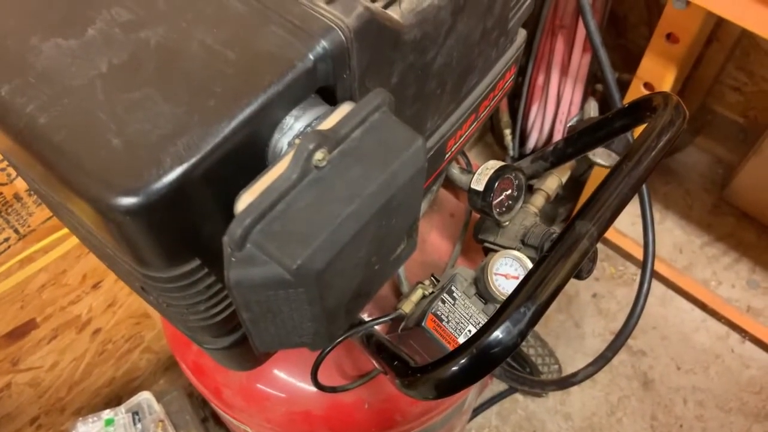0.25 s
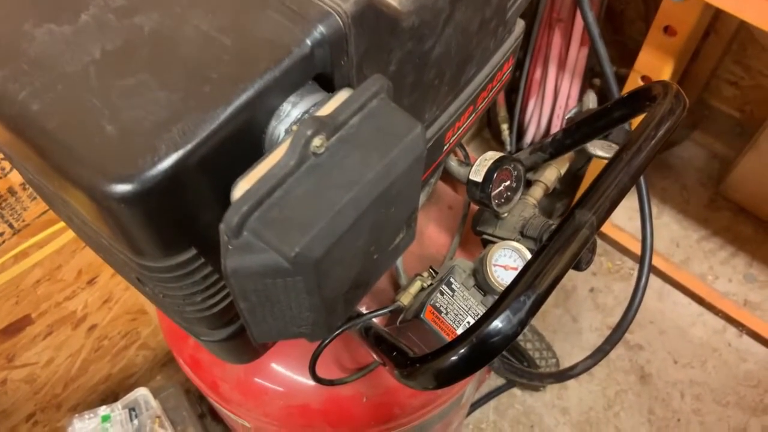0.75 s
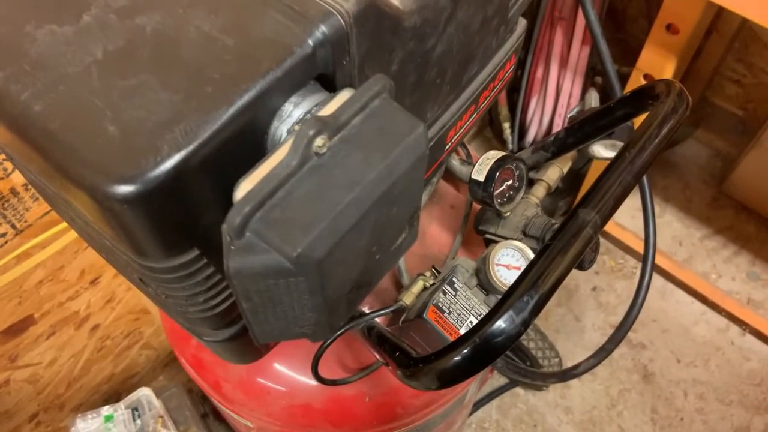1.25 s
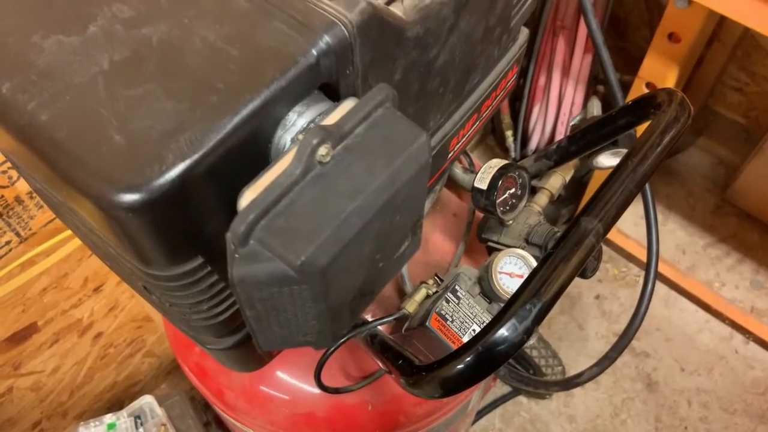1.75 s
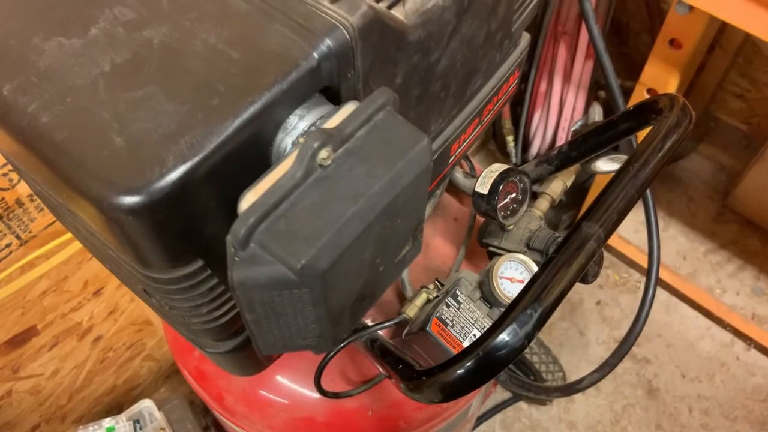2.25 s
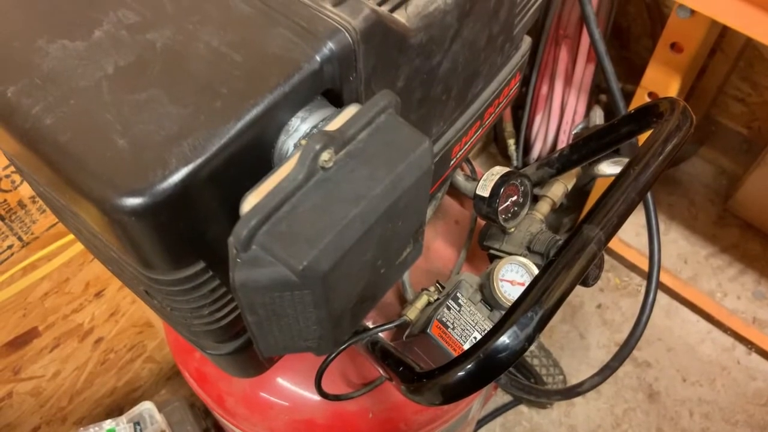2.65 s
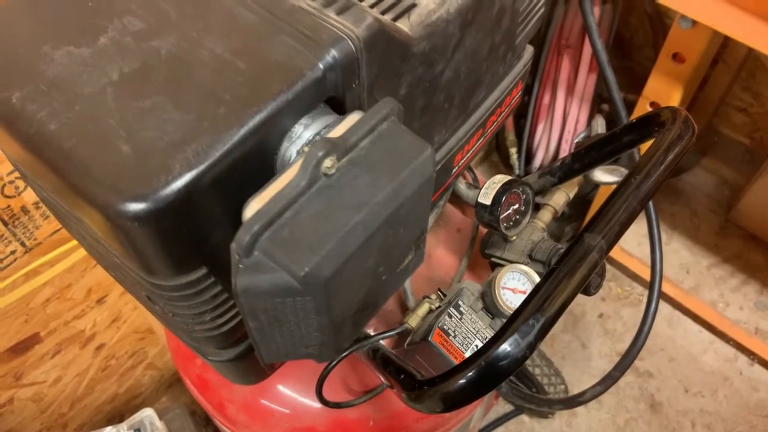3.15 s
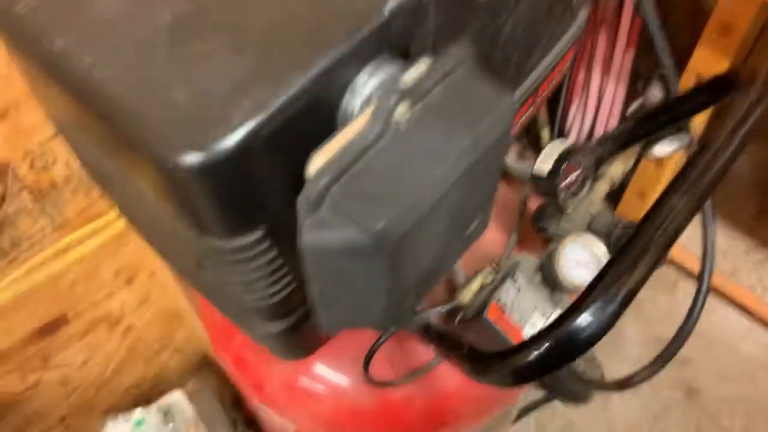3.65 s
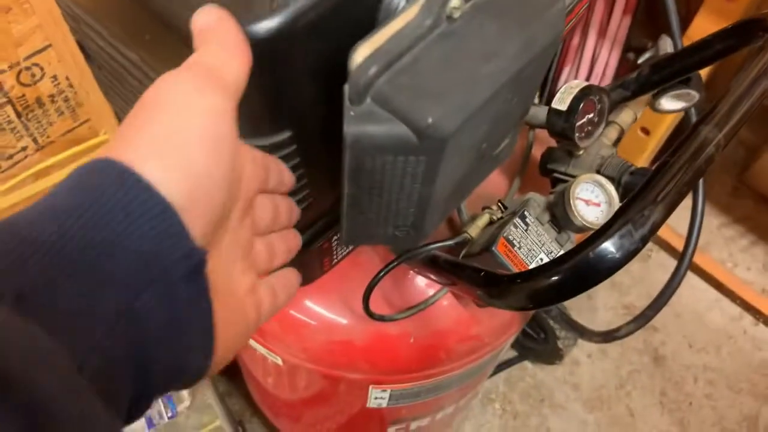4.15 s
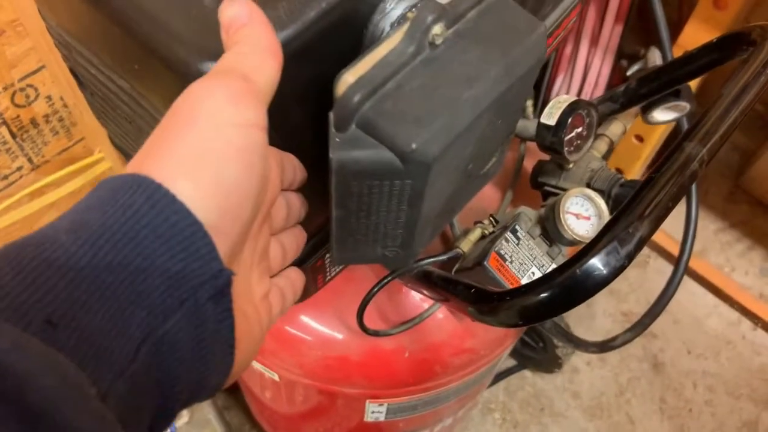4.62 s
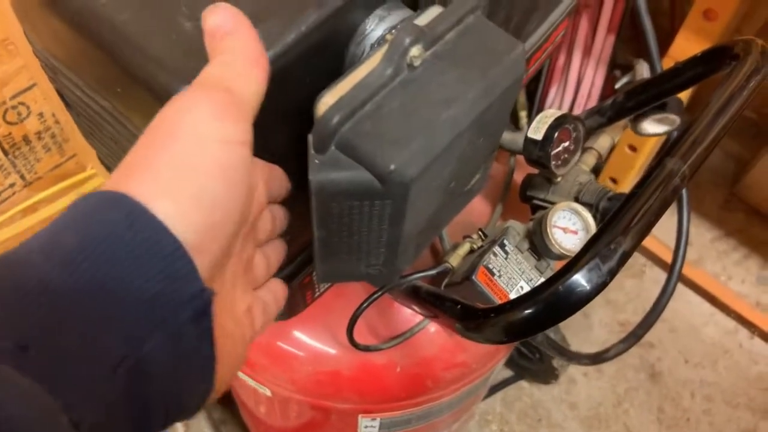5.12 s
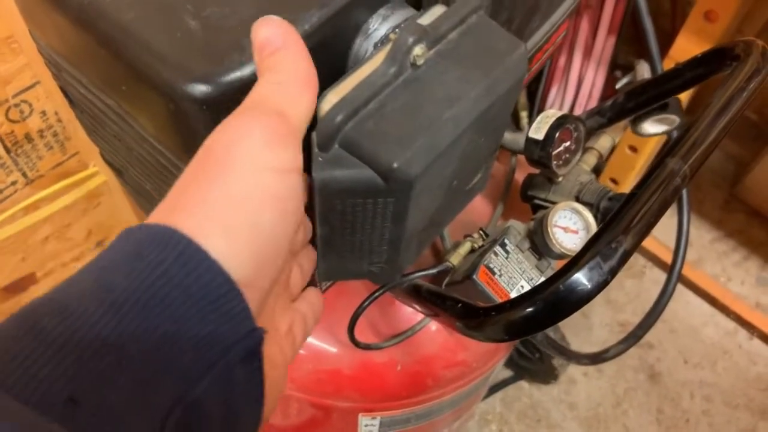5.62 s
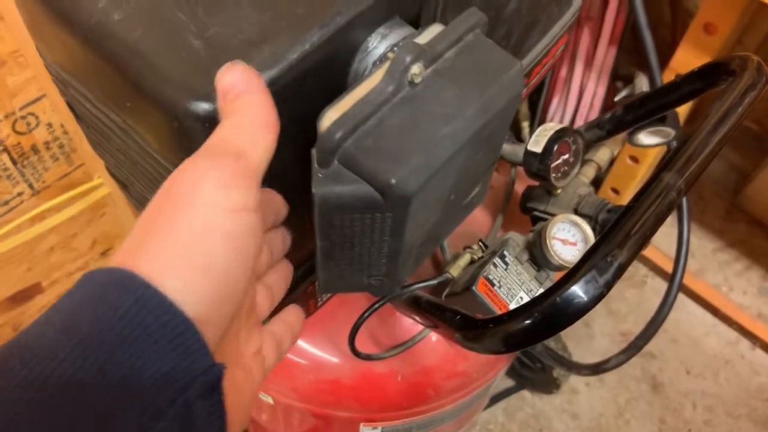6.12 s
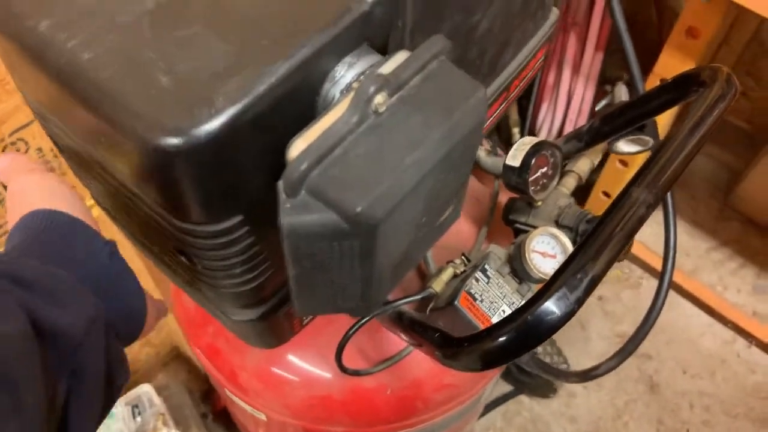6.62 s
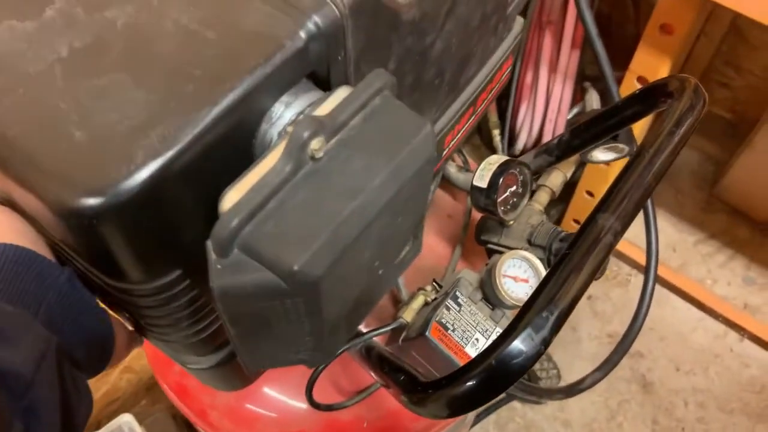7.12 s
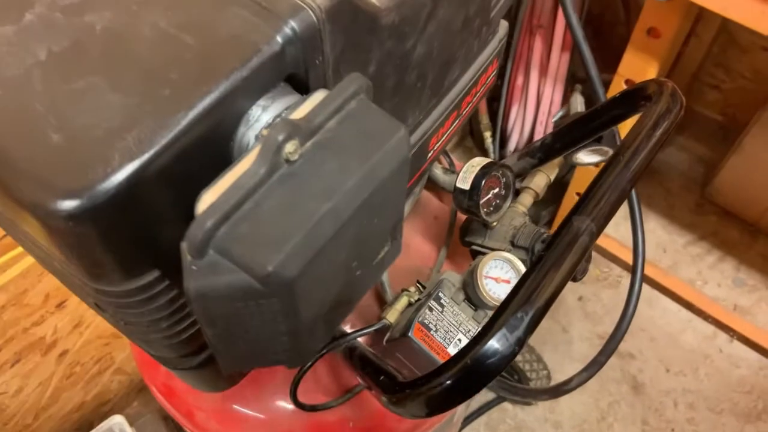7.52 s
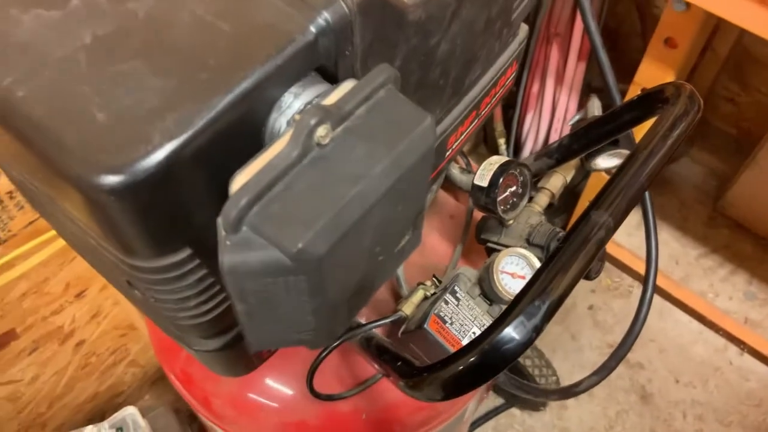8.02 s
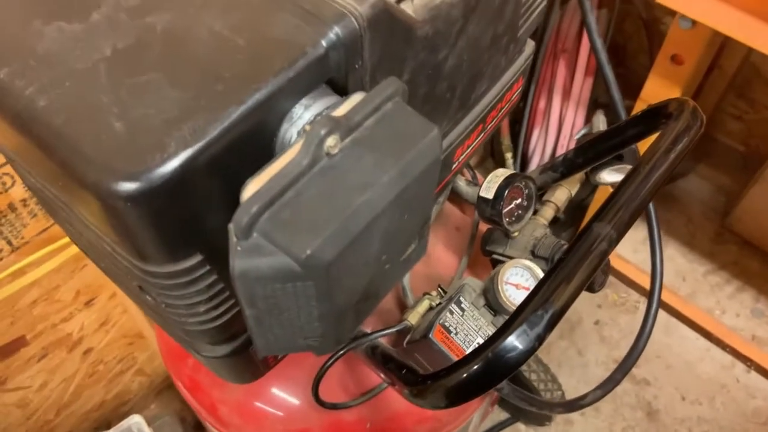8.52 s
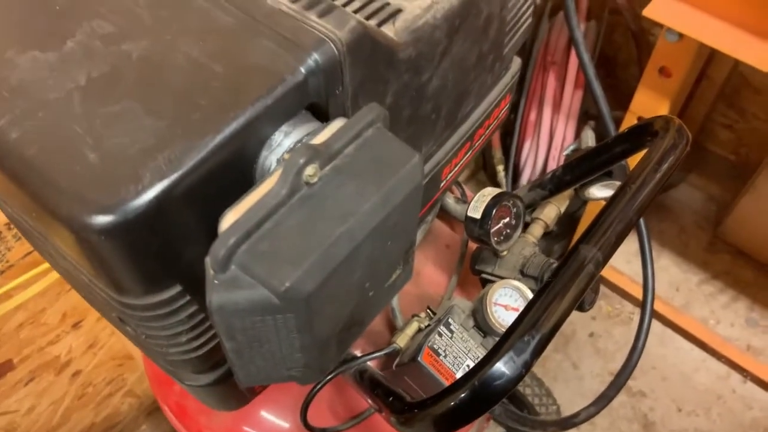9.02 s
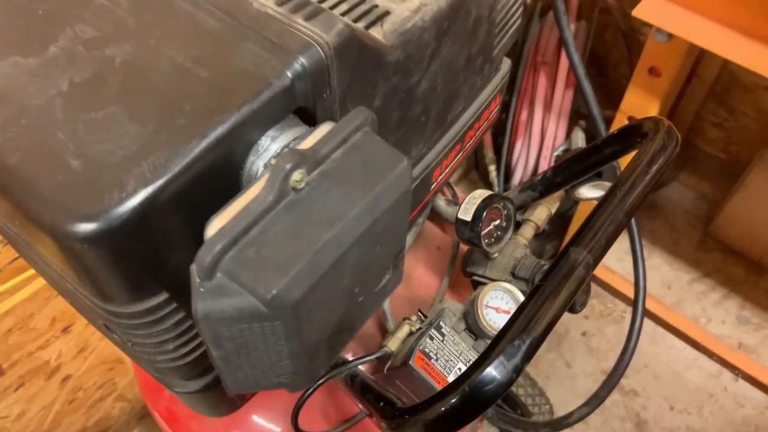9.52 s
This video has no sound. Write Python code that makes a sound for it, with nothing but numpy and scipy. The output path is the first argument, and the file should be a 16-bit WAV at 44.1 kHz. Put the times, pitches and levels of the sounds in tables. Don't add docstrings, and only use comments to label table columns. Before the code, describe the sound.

Steady compressor motor and pump noise, close and dense, already running at the start and still running at the end. Deep buzzing drone at constant speed, casing rumble below, gritty valve rattle in the middle, steady bright hiss on top. Slight colour changes as the phone and a hand move; close stereo phone pickup, almost no room heard.

```python
import sys
import numpy as np
from scipy import signal
from scipy.fft import rfft, irfft, next_fast_len
from scipy.io import wavfile
from scipy.ndimage import uniform_filter1d, map_coordinates

SR = 44100
rng = np.random.default_rng(int(sys.argv[2]) if len(sys.argv) > 2 else 0)


def wav_record(signal):
    frames = np.transpose(np.atleast_2d(signal))
    bounded = np.clip(frames, -1, 1)
    quanta = np.round(bounded * 32767).astype(np.int16)
    wavfile.write(sys.argv[1], SR, quanta)


def invert_db(level):
    return 10 ** (np.asarray(level, dtype=float) / 20)


N = 430857

# (time [s], rotation rate [turns/s])
SPEED = [(0, 58.775), (4, 58.76), (9.77, 58.745)]
STEP = 2205


def unit(x):
    return x / np.sqrt(np.mean(x ** 2) + 1e-20)


def along(points, hz):
    f, v = np.transpose(points)
    return np.interp(np.log(hz + 1), np.log(f + 1), v)


def curves(rows, s):
    t, *cols = np.transpose(rows)
    return [np.interp(s, t, c) for c in cols]


def bump(s, centre, half_width):
    return np.exp(-.5 * ((s - centre) / half_width) ** 2)


def posed(values, s):
    # (start [s], end [s])
    pose_moves = [
        (3.3, 4.2),
        (6.1, 6.3),
        (7.45, 7.54),
    ]
    return np.interp(s, np.ravel(pose_moves), np.repeat(values, 2)[1:-1])


def filtered(x, response):
    m = next_fast_len(N + 8192)
    return irfft(rfft(x, m) * response(np.fft.rfftfreq(m, 1 / SR)), m)[..., :N]


def field(shape, rows, cols):
    z = rng.standard_normal(shape)
    for _ in range(2):
        z = uniform_filter1d(z, rows, axis=-2)
        z = uniform_filter1d(z, cols, axis=-1)
    return unit(z)


def noise(spectrum, comb_db, patchy_db):
    z = signal.stft(rng.standard_normal((2, N)), nperseg=1024)[2]
    ripples = comb_db * field(z.shape[1:], rows=2, cols=90)
    patches = patchy_db * field(z.shape[1:], rows=2, cols=6)
    pair = signal.istft(z * invert_db(ripples + patches), nperseg=1024)[1][:, :N]
    return unit(filtered(pair, lambda hz: invert_db(along(spectrum, hz))))


def fan_hiss():
    # (frequency [Hz], density [dB per Hz])
    hiss_spectrum = [(3000, -31), (4500, -6), (5900, 0.5), (7500, -0.5), (9800, 4.5), (12000, 2.5),
                     (14000, 2.5), (15600, 4), (16500, -11)]
    return invert_db(-37.5) * noise(hiss_spectrum, comb_db=2.0, patchy_db=1.34)


def casing_rumble(s):
    # (frequency [Hz], density [dB per Hz])
    rumble_spectrum = [(15, -57), (25, -21), (65, -10.5), (107, -5.5), (199, -5.5), (293, -4), (318, -5),
                       (345, -9.5), (469, -8), (534, -9), (1200, -22), (1560, -65), (2640, -120)]
    casing_db = (-46.8, -45.5, -47, -47)
    return invert_db(posed(casing_db, s)) * noise(rumble_spectrum, comb_db=1.3, patchy_db=0.5)


def valve_noise(s, angle):
    # (frequency [Hz], density [dB per Hz])
    rush_spectrum = [(400, -20), (600, -12.5), (800, 3), (1000, 3), (1400, -4), (1700, -3), (2000, -6),
                     (2300, -5.5), (2700, -5), (3100, -9), (3600, -4.5), (4300, -9), (6000, -59)]
    # (frequency [Hz], density [dB per Hz])
    slap_spectrum = [(400, -39.5), (600, -1), (1000, 5.5), (1300, -6), (2200, -9.5), (3000, -47)]
    valve_db = (-46, -46.2, -46, -46.5)
    slap_over_db = (-6.5, -8.5, -10, -8.5)
    rush_db = posed(valve_db, s)
    since = (angle - .72) % 1
    turn_number = np.cumsum(np.diff(since, prepend=0) < 0)
    strength = invert_db(4 * rng.standard_normal(600))[turn_number]
    burst = unit(strength * since * np.exp(-since / 0.08))
    hit = unit(filtered(rng.standard_normal((2, N)), lambda hz: invert_db(along(slap_spectrum, hz))))
    slap = invert_db(rush_db + posed(slap_over_db, s)) * burst * hit
    rush = invert_db(rush_db) * noise(rush_spectrum, comb_db=0.5, patchy_db=1.6)
    return rush + slap


def strengths(s, k):
    # (multiple of shaft speed [1], level [dB])
    rotor_orders = [(1, -47.5), (2, -34.0), (3, -39.5), (4, -38.0), (6, -52.5), (7, -50.5), (9, -71),
                    (12, -56), (13, -58.5), (14, -57.5), (16, -62.5), (19, -63), (20, -66), (22, -63),
                    (23, -62), (24, -69), (27, -64.5), (28, -62.5), (31, -61), (34, -64), (35, -64),
                    (38, -63),
                    (44, -63), (53, -65), (57, -64), (60, -62), (66, -67), (71, -65), (72, -64), (73, -64),
                   (77, -67), (79, -68), (81, -65), (85, -68), (97, -69), (99, -66)]
    # (frequency [Hz], level [dB])
    rattle = [(2400, -67.5), (4000, -65.5), (5500, -63), (7500, -74)]
    # (frequency [Hz], level [dB])
    uneven = [(400, -78.5), (730, -72), (1000, -72), (1400, -71.5), (2000, -75), (2600, -86)]
    thump_pose_db = (-35, -34, -34.5, -34.5)
    boom_pose_db = (-33, -32, -31.6, -31.8)
    # (time [s], boom change [dB])
    cover = [
        (4.78, -2),
        (5.18, -3.5),
        (5.55, -1.5),
    ]
    singing = [8, 10, 11, 15, 17, 18, 21, 25, 26, 29, 30, 32, 33, 36, 37, 39, 51, 61, 62, 100, 102]
    # (still [dB], hand [dB], aside [dB], lowered [dB])
    singing_db = [(-48.5, -44.5, -44.5, -47.5), (-56.5, -55.5, -55, -65), (-60, -56, -58.5, -60),
                  (-54.5, -61, -59, -57), (-58.5, -55, -54.5, -58.5), (-56.5, -56, -51, -55),
                  (-57, -58, -55, -53.5), (-67, -54.5, -56, -59.5), (-53.5, -53.5, -58, -61),
                  (-58.5, -60, -67, -65), (-63, -60.5, -64, -64), (-57.5, -59.5, -57, -58),
                  (-54.5, -54, -54.5, -51.5), (-56.5, -54, -53, -51.5), (-59.5, -57, -67, -57),
                  (-63, -64, -57, -59), (-64.5, -62, -66, -51.5), (-65, -57, -64, -56),
                  (-70, -63, -64, -60), (-57, -58, -55, -59.5), (-59.5, -56, -66, -70)]
    # (order [1], time [s], half length [s], change [dB])
    swells = [(10, 4, .45, 4.5), (10, 9.5, 0.22, 5), (15, 8.5, .3, 6), (18, 0.8, .3, 5.5), (18, 3.5, .3, 4),
              (18, 6.5, 0.28, 2.5), (18, 7.8, .3, 4.5), (21, 7, 0.38, 6.5), (26, 8.3, .4, -4),
              (33, 0, 0.55, 4.5), (33, 3.5, .3, 4.5), (33, 5, 0.44, -4.5), (36, -0.5, .6, -7),
              (36, 6, .4, 3.5), (36, 8, 0.5, 4.5), (36, 9.5, 0.28, -11), (51, 0, .4, -12),
              (51, 3.5, 0.48, 11), (51, 6.5, 0.68, -13), (51, 9.5, 0.23, -4.5), (61, 0, 0.36, 10),
              (61, 6, .3, -5), (100, 8, 0.65, 7), (100, 8, 0.57, -5), (102, 5.2, .4, 3), (104, 7.3, .4, -7),
              (102, 7, .3, 9)]

    hz = k * SPEED[1][1]
    usual = np.where(k % 1 == 0, along(rattle, hz), along(uneven, hz)) + 3 * rng.standard_normal(len(k))
    level = np.tile(usual, (len(s), 1))
    for order, db in rotor_orders:
        level[:, k == order] = db
    covered_db = sum(db * bump(s, at_s, 0.051) for at_s, db in cover)
    thump_db = posed(thump_pose_db, s) + 0.28 * covered_db
    settling_db = -2 * np.exp(-s / 0.82)
    boom_db = posed(boom_pose_db, s) + covered_db + settling_db
    level[:, [2, 4, 6, 8]] += (thump_db - thump_db.mean())[:, None]
    level[:, [12, 14]] += (boom_db - boom_db.mean())[:, None]
    steered = np.isin(k, [5] + singing)
    level[:, steered] = np.transpose([boom_db] + [posed(row, s) for row in singing_db])
    for order, at_s, half_s, db in swells:
        level[:, k == round(order)] += db * bump(s, at_s, half_s)[:, None]
    return level, steered


def order_phases(k):
    hz = k * SPEED[1][1]

    def lag(at_hz, wide_hz):
        return np.arctan2(hz * wide_hz, at_hz ** 2 - hz ** 2)

    stroke = .46 + 2.52 * k - .68 * k ** 2
    stroke = stroke - lag(290, 10) - lag(335, 20) + lag(385, 20)
    scatter = np.clip(k / 14, 0, 4) * rng.standard_normal((2, len(k)))
    slap = -2 * np.pi * .78 * k + scatter
    return np.where(k < 9, stroke, slap) + [[0], [np.pi / 2]]


def pump():
    cycle = 8192
    s = np.arange(N // STEP + 2) * STEP / SR
    k = np.arange(250) / 2
    level, steered = strengths(s, k)
    phase = order_phases(k)
    drift = np.clip((k - 5) / 14, 0, 1) * np.where(steered, .12, .45)
    flutter = .02 + .14 * np.clip(k / 40, 0, 1)
    shape = (2, len(s), len(k))
    slow = field(shape, rows=22, cols=1) + 1j * field(shape, rows=22, cols=1)
    quick = rng.standard_normal(shape) + 1j * rng.standard_normal(shape)
    size = (1 + drift * slow + flutter * quick) / np.sqrt(1 + 2 * drift ** 2)
    audible = k > 0
    spectrum = np.sqrt(2) * invert_db(level) * size * np.exp(1j * phase)[:, None] * audible
    turns = irfft(spectrum, cycle) * cycle / 2
    turns = np.concatenate([turns, turns[..., :1]], axis=-1)
    rate = curves(SPEED, np.arange(N) / SR)[0]
    angle = (.917 + np.cumsum(rate) / SR) % 2
    where = [np.arange(N) / STEP, angle * cycle / 2]
    return np.array([map_coordinates(v, where, order=1) for v in turns]), angle


def ports(pair):
    # (frequency [Hz], left-right likeness [1])
    likeness = [(60, .996), (240, .997), (295, .955), (400, .96), (550, .8), (1200, .82), (1500, .5),
                (1800, .78), (2500, .45), (3500, .72), (4500, .975), (6800, .96), (9000, .97),
                (11000, .985), (15500, .99)]
    # (frequency [Hz], left minus right [dB])
    treble_lean = [(250, 0), (320, .8), (470, -2.5), (800, -1), (1200, -3.5), (1700, -2.5), (2500, -1),
                   (3500, 0)]
    # (frequency [Hz], lead of the left port [cycles])
    left_lead = [(0, 0), (2000, 0), (3000, .13), (4000, .29), (4700, .5), (5100, .575), (6800, 1),
                 (13280, 2.5), (15350, 3), (17000, 3.4)]
    # centre [Hz], width [Hz], loss of likeness [1]
    opposed = [(800, 845, 670, 785), (145, 190, 150, 190), (1.2, 1.7, 1.56, 1.38)]
    bass_lean = (-.7, -1.6, -1.1, -1.1)
    # (centre [Hz], width [Hz])
    nearby = [(1110, 81), (2240, 220), (2937, 39), (3560, 110), (2900, 520), (1540, 130), (12300, 3100)]
    # (still [dB], hand [dB], aside [dB], lowered [dB])
    nearby_lift = [(-1, -1, -2, -1.2), (.5, -0.5, 1, 2), (-3, -0.5, -1, 1.5), (-0.5, 1.5, 4, 4),
                   (0.5, -1.3, -0.5, -1.7), (1, 0, 1, -0.5), (0.2, 0.1, 0.5, .5)]

    hz, s, (same, other) = signal.stft(pair, SR, nperseg=2048, noverlap=1536)
    hz = hz[:, None]
    centre_hz, width_hz, loss = (posed(row, s) for row in opposed)
    short_wave = np.clip((hz - 330) / 220, 0, 1)
    alike = along(likeness, hz) - short_wave * loss * bump(hz, centre_hz, width_hz)
    mixing = np.arccos(np.clip(alike, -1, 1)) / 2
    shared = np.cos(mixing) * same
    unshared = np.sin(mixing) * other
    both = np.array([shared + unshared, shared - unshared])
    lean_db = along(treble_lean, hz) + posed(bass_lean, s) / (1 + (hz / 270) ** 4)
    lift_db = sum(posed(row, s) * bump(hz, at_hz, wide_hz)
                  for (at_hz, wide_hz), row in zip(nearby, nearby_lift))
    half = np.array([.5, -.5])[:, None, None]
    lead = np.exp(2j * np.pi * half * np.interp(hz, *np.transpose(left_lead)))
    heard = both * invert_db(lift_db + half * lean_db) * lead
    return signal.istft(heard, SR, nperseg=2048, noverlap=1536)[1][:, :N]


def scene():
    s = np.arange(N) / SR
    tones, angle = pump()
    air = casing_rumble(s) + valve_noise(s, angle) + fan_hiss()
    return ports(tones + air)


def band_limit(x):
    return signal.sosfilt(signal.butter(12, 17070, fs=SR, output="sos"), x)


def record(dry):
    top_hz = 15750
    mix = filtered(dry, lambda hz: hz < top_hz)
    return band_limit(mix)


dry = scene()
out = record(dry)
wav_record(out)
```